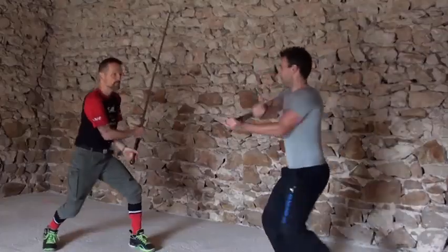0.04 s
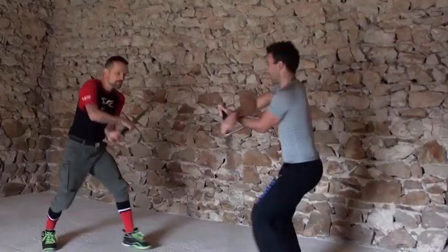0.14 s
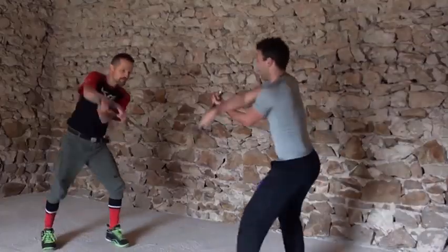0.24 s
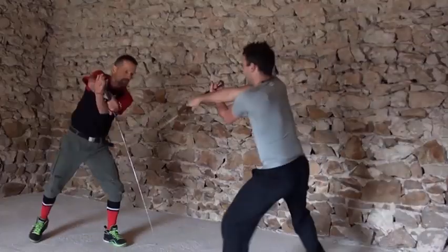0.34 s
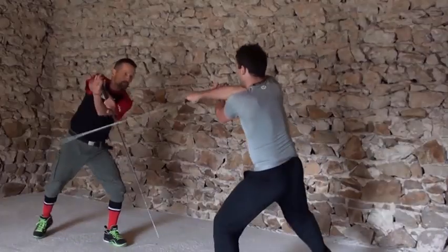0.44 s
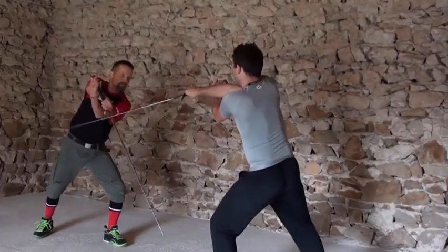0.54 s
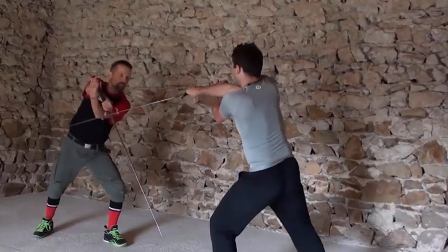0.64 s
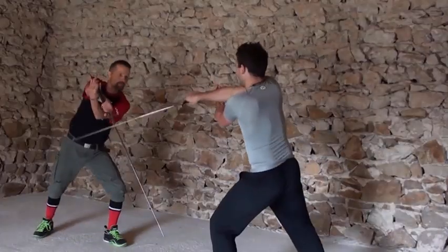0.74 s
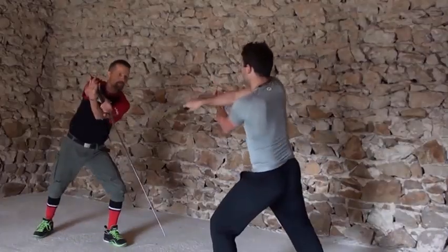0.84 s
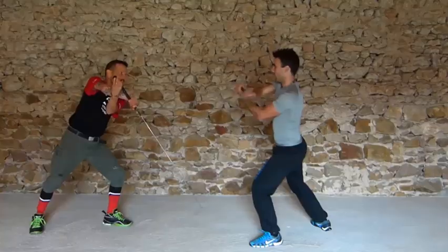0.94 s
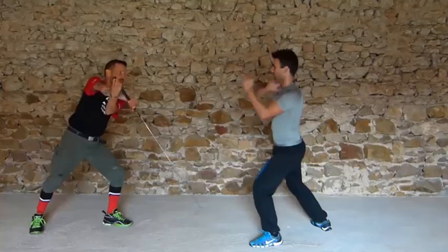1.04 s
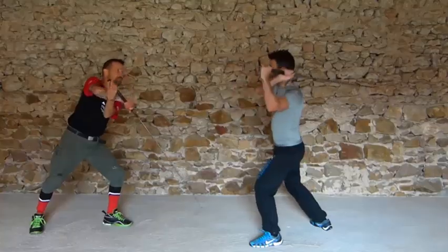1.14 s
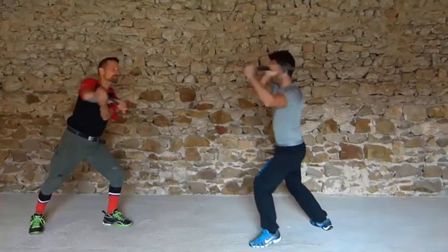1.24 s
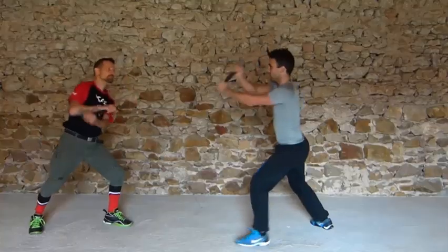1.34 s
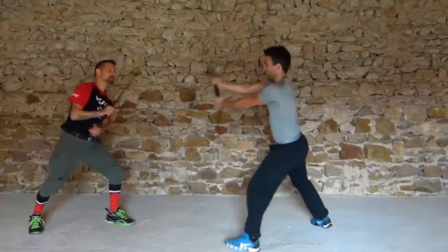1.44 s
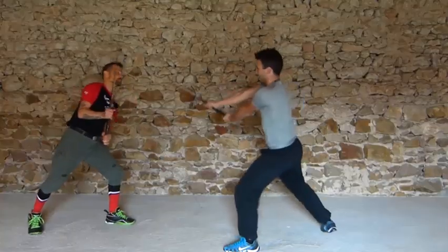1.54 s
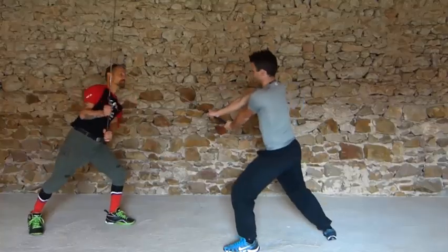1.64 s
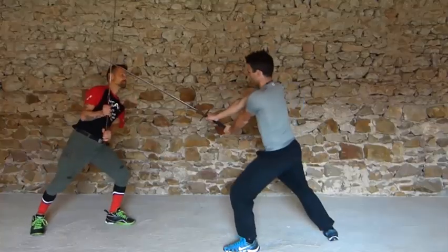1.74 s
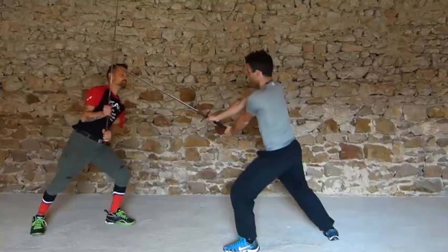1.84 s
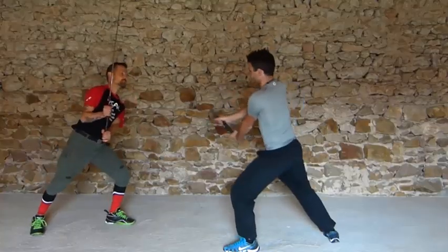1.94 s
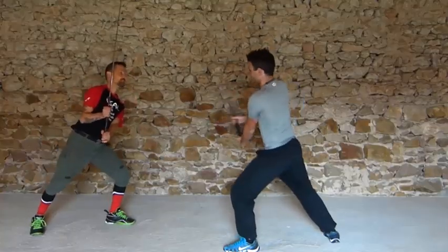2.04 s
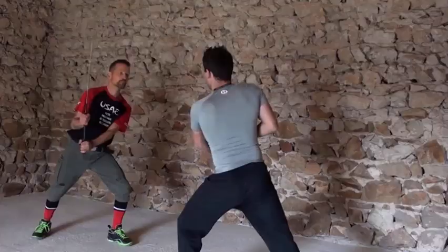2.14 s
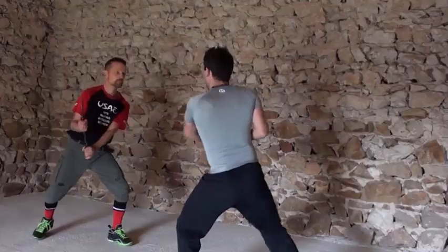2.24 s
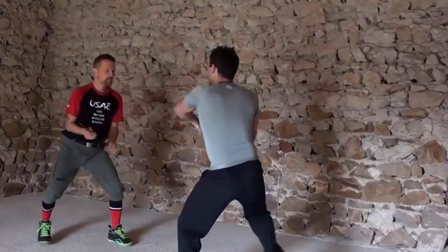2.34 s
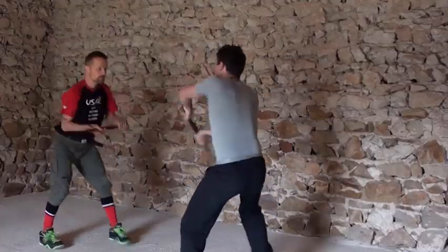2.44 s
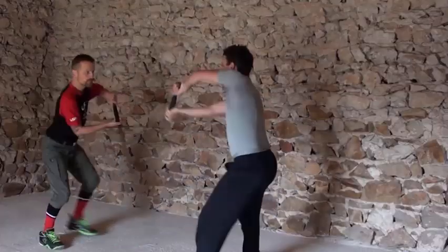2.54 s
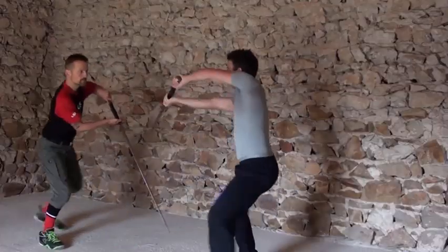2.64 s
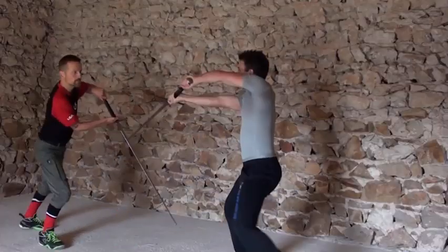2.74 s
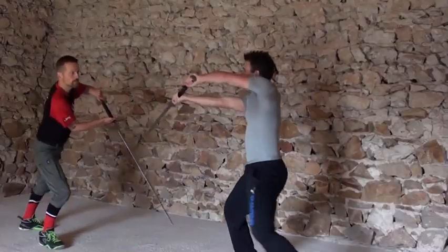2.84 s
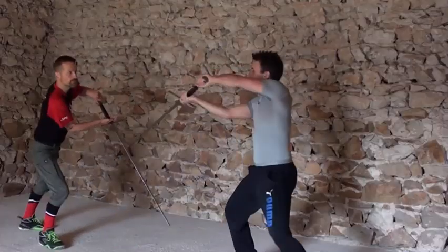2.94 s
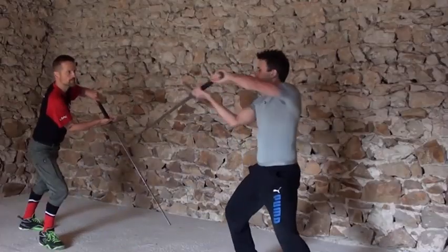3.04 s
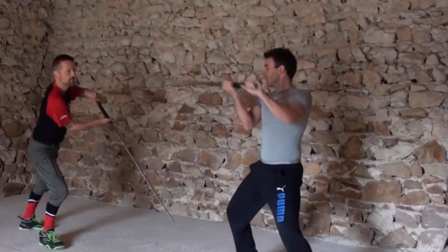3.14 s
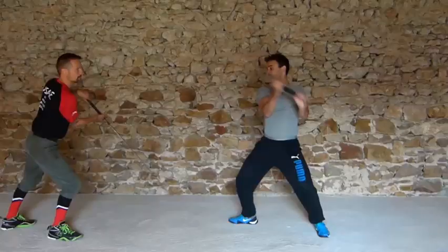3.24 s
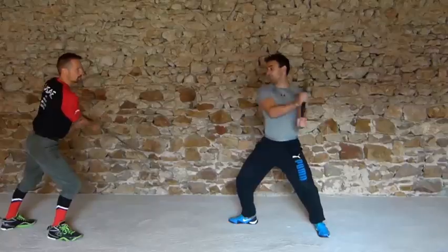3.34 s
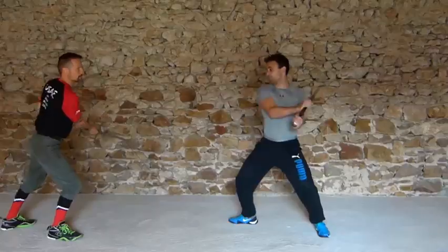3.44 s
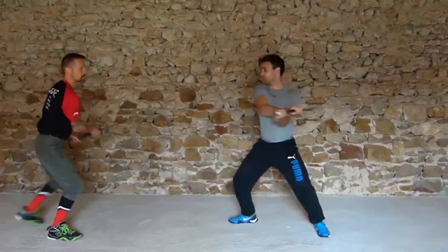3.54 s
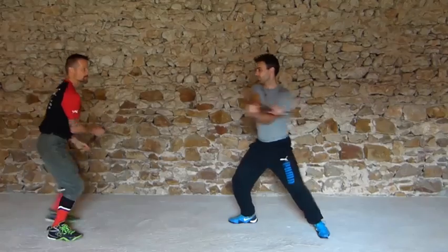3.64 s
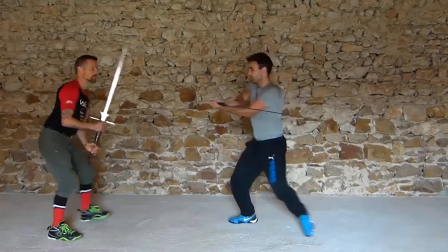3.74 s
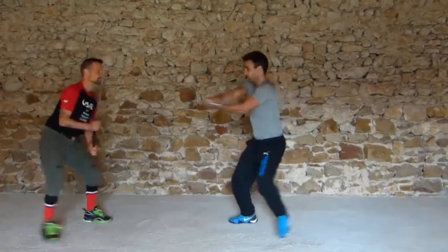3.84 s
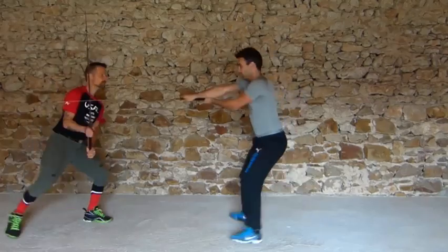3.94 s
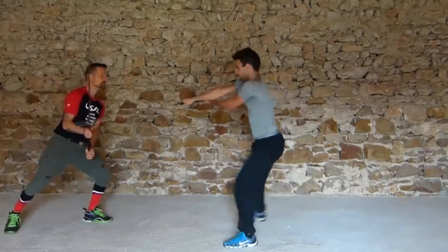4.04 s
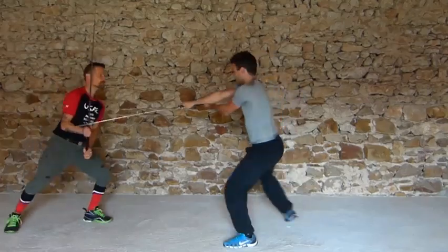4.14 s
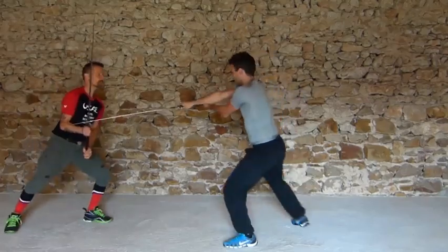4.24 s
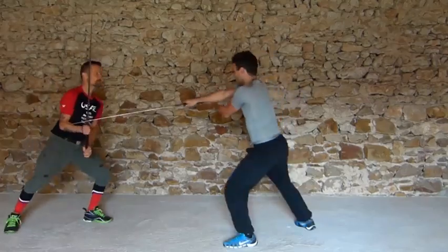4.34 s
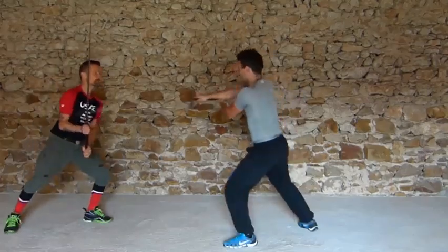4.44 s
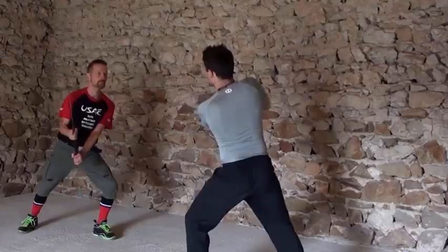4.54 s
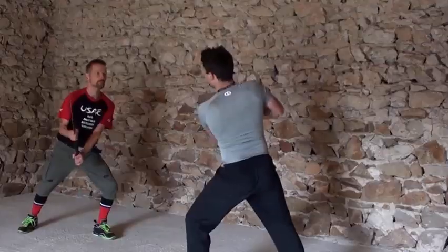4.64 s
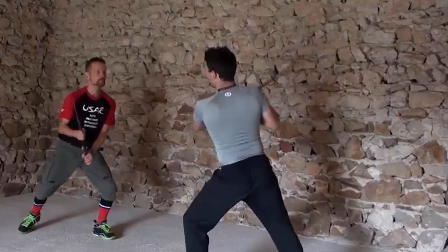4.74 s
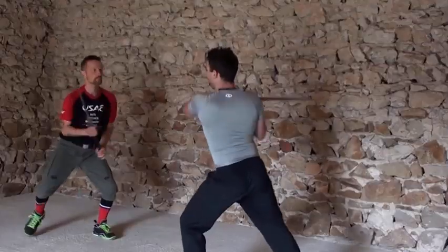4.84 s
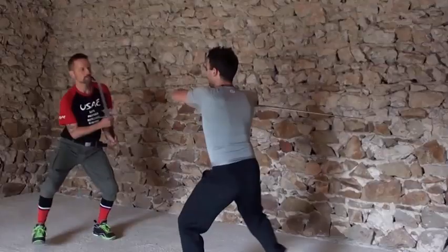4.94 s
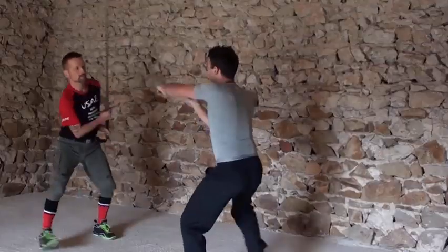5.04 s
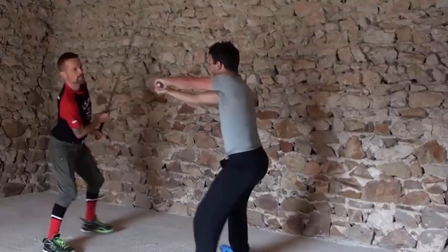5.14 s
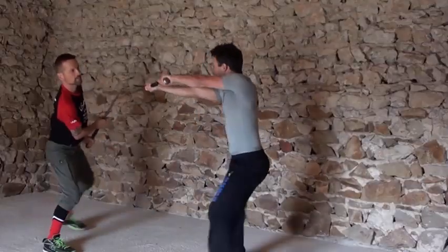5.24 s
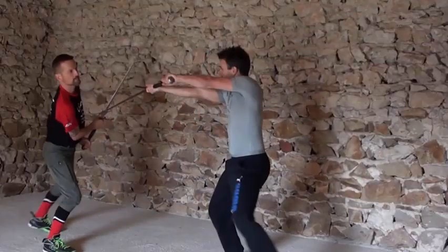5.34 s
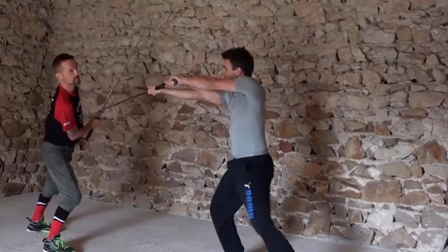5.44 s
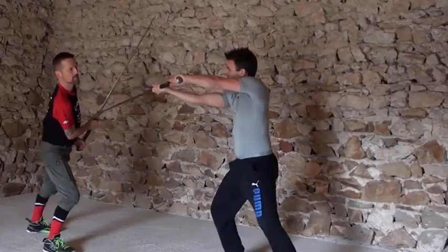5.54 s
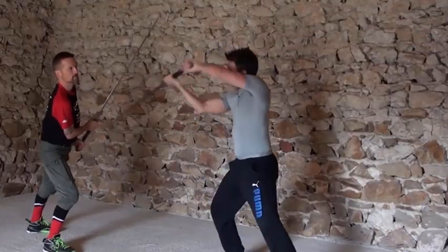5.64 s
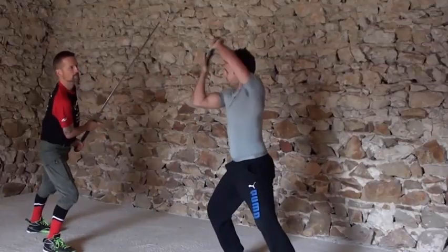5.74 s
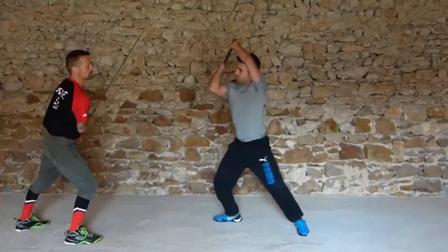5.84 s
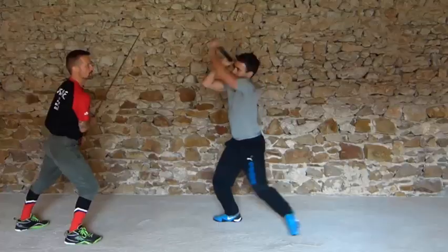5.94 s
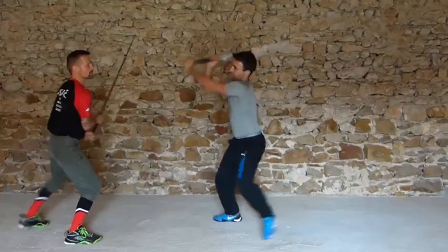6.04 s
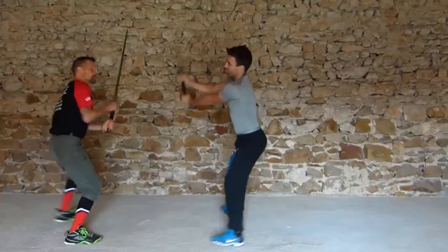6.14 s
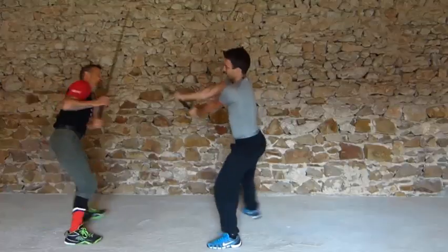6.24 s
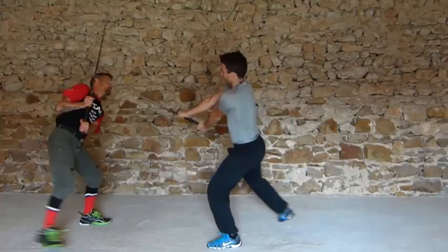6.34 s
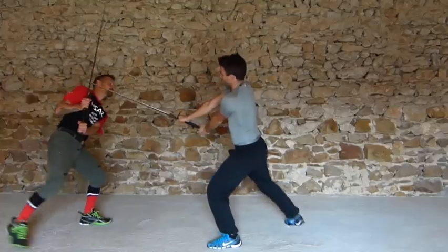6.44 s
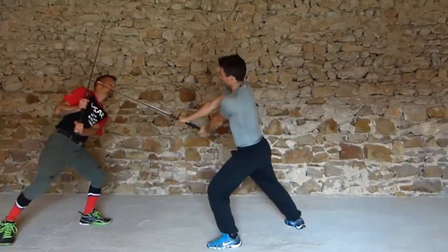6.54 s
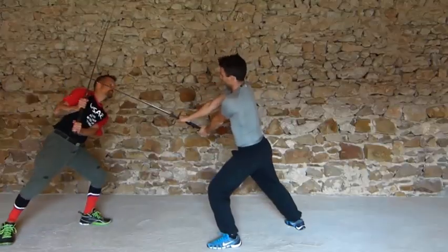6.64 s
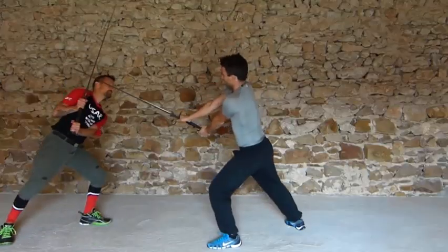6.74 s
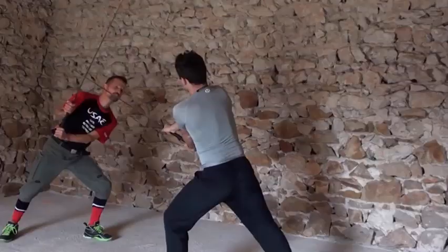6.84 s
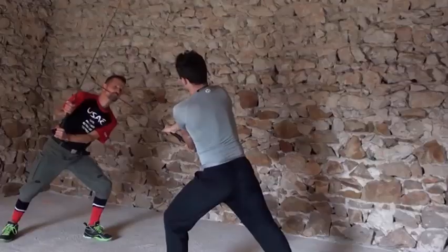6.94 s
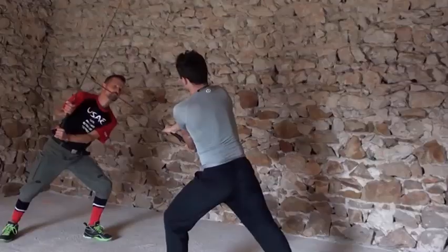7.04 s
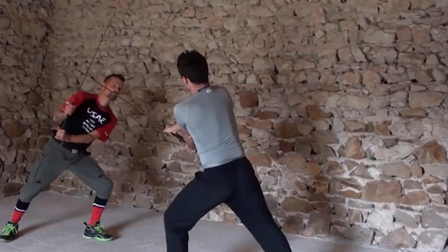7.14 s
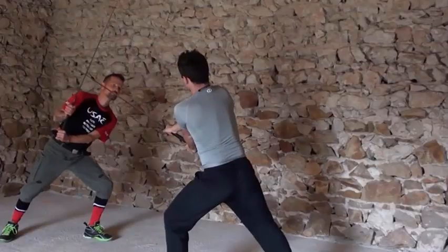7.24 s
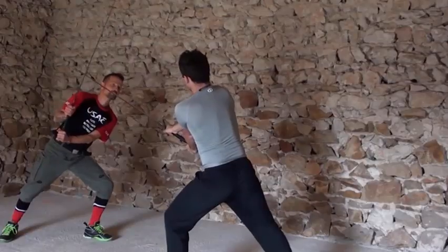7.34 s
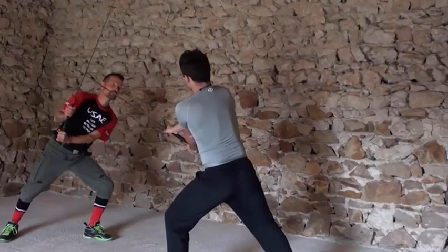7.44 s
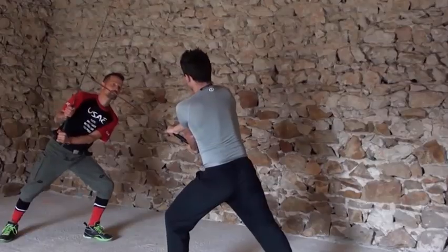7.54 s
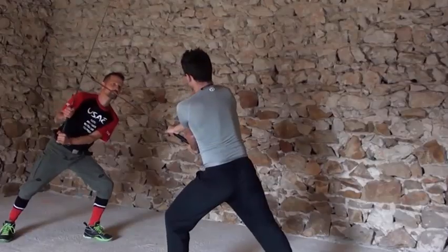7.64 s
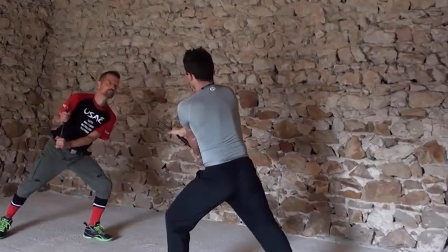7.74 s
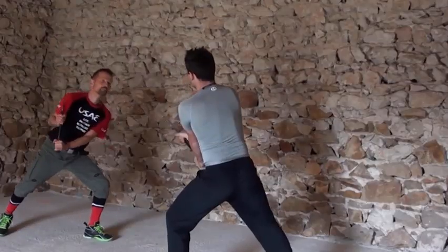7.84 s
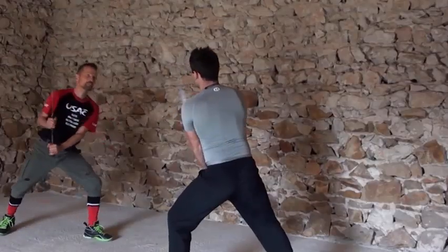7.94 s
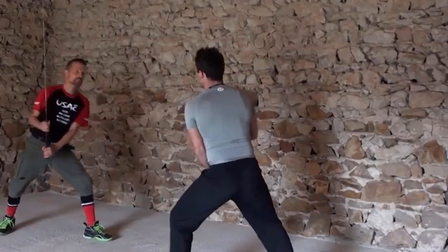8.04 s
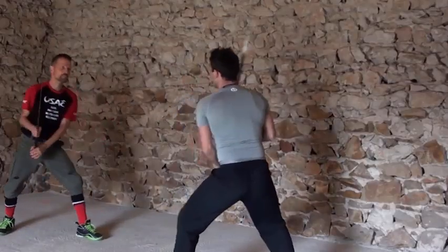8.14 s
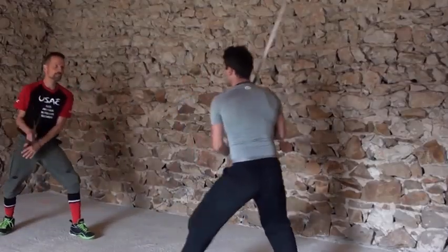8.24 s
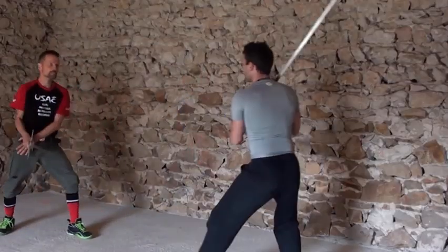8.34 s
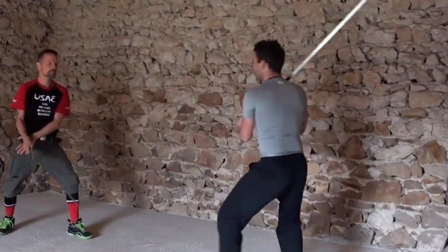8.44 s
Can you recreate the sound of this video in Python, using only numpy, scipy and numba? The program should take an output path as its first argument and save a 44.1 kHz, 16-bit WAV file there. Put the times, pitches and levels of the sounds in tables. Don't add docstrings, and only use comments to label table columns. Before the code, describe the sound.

Two steel longswords clash in hard bright cracks, singly and in quick pairs, ringing high and briefly in a bare stone room with shoe scuffs between.

```python
import sys
import numpy as np
from scipy import signal
from scipy.fft import rfft, irfft
from scipy.io import wavfile
from scipy.ndimage import uniform_filter1d, minimum_filter1d, map_coordinates
from numba import njit

SR = 44100
rng = np.random.default_rng(int(sys.argv[2]) if len(sys.argv) > 2 else 0)


def unload_wav(signal):
    wavfile.write(
        sys.argv[1],
        SR,
        np.round(np.clip(np.atleast_2d(signal).T, -1, 1) * 32767).astype(np.int16),
    )


def volts_from_decibels(level):
    exponent = np.asarray(level, float) / 20
    return 10 ** exponent


N = 374409


def colour(x, table):
    hz, db = np.transpose(table)
    log_hz = np.log(np.linspace(1, SR / 2, 1025))
    cepstrum = irfft(np.interp(log_hz, np.log(hz), db) * np.log(10) / 20)
    cepstrum[1:1024] *= 2
    cepstrum[1025:] = 0
    response = irfft(np.exp(rfft(cepstrum)))
    return signal.oaconvolve(x, response / np.sqrt(np.sum(response ** 2)))[:len(x)]


def band(x, lo_hz, hi_hz):
    sos = signal.butter(2, [lo_hz, min(hi_hz, .45 * SR)], "band", fs=SR, output="sos")
    y = signal.sosfilt(sos, x)
    return y / np.std(y)


def walk(rate):
    hold = int(SR / rate)
    levels = np.repeat(rng.standard_normal(N // hold + 1), hold)
    return 1.3 * uniform_filter1d(uniform_filter1d(levels, hold), hold)[:N]


def bursts(s, db, t60_s, rise_s):
    size = 2048
    t, out = np.arange(size) / SR, np.zeros(N + size)
    shape = volts_from_decibels(-60 * t / t60_s) * (1 - np.exp(-t / rise_s))
    rattle = rng.standard_normal((len(s), size))
    for _ in range(4):
        spectrum = rfft(rattle * shape)
        rattle = irfft(spectrum / np.abs(spectrum)) / np.sqrt(shape + 1e-3)
    rattle = rattle * shape
    for at, gain, one in zip((s * SR).astype(int), volts_from_decibels(db), rattle):
        out[at:at + size] += gain * one / np.linalg.norm(one)
    return out[:N]


def envelopes(shape):
    t = np.arange(0, N / SR + .001, .001)
    return np.interp(np.arange(N) / SR, t, shape(t).sum(axis=0))


def fading(s, db, t60_s, beats=0):
    swell_s = .018
    s, db, t60_s, beats = s[:, None], db[:, None], t60_s[:, None], np.reshape(beats, (-1, 1))
    stilled_s = np.r_[s[1:], [[N / SR]]]

    def swelling_ring(t):
        age_s = (t - s).clip(0)
        decay = volts_from_decibels(db - 60 * age_s / t60_s)
        swell = 1 - np.exp(-age_s / swell_s)
        stilling = np.exp(-(t - stilled_s).clip(0) / swell_s)
        return decay * swell * stilling * np.cos(np.pi * beats * (t - s))
    return envelopes(swelling_ring)


@njit
def ring(at, size, pole, keep):
    out = np.zeros(N)
    for m in range(len(pole)):
        z, k = 0j, 0
        for i in range(N):
            if k < len(at) and i == at[k]:
                z, k = z * keep[k] + size[k, m], k + 1
            z = z * pole[m] + 1e-18
            out[i] += z.imag
    return out


def strike(s, db, keep, modes, scatter_db, sway_m):
    hz, mode_db, t60_s = np.transpose(modes)[:3]
    size = volts_from_decibels(db + mode_db + scatter_db * rng.standard_normal((len(s), len(hz))))
    pole = np.exp(2j * np.pi * hz / SR - np.log(1000) / (t60_s * SR))
    order = np.argsort(s)
    tone = ring((s[order] * SR).astype(np.int64), size[order], pole, keep[order])
    delay = sway_m / 343 * SR * walk(4)
    return map_coordinates(tone, [np.arange(N) + delay], order=3)


def hush():
    # pitch_hz, level_db
    air = [(25, 7.5), (100, -12), (330, -8), (800, -20.5), (2000, -24.5), (6000, -25), (11000, -32.5),
           (16000, -31.5)]
    mid, side = (colour(rng.standard_normal(N), air) for _ in range(2))
    return volts_from_decibels(-59.5) * (mid + volts_from_decibels(-2.5) * side * np.array([[1], [-1]]))


def scuffs():
    # start_s, length_s, level_db, rasp_db, hiss_db
    drags = [(0.0, 0.016, -50.5, -2, -3), (0.133, 0.14, -19.5, -6.5, -10), (0.302, 0.03, -21, -6.5, -32.5),
             (1.4, 0.081, -41.5, -3, -27), (0.98, 0.2, -52.5, -8.5, -18), (1.19, 0.43, -45, -5.5, -11.5),
             (2.097, 0.25, -55.5, 0.5, 1.5), (2.381, 0.15, -45.5, -6, 2.5), (3.18, 0.033, -73, 29.5, 22),
             (3.365, 0.045, -76, 24, 22.5), (3.448, 0.19, -51, 3.5, -1.5), (3.662, 0.22, -44.5, -9, -10.5),
             (4.278, 0.11, -37.5, 6, -1.5), (4.45, 0.29, -81, 16, 11), (4.601, 0.13, -60, 5.5, 14),
             (4.76, 0.085, -56, 1, -8), (4.843, 0.052, -60.5, 1, -2.5), (5.032, 0.23, -39, -13, -10.5),
             (5.828, 0.14, -60, -3.5, -3.5), (6.012, 0.23, -45, 2.5, 2), (6.63, 0.17, -63.5, 19, 16),
             (6.695, 0.26, -61, 6.5, -5), (7.108, 0.052, -67, 13, 9), (7.494, 0.17, -58, 6, 1),
             (7.63, 0.093, -45, -7.5, -10), (7.749, 0.3, -53.5, -3, -1), (8.078, 0.15, -28.5, -4, -9.5),
             (8.19, 0.15, -40.5, -8.5, -8)]
    # pitch_hz, level_db
    sliding_sole = [(35, -79), (60, -22.5), (466, -5), (629, -3.5), (702, -4.5), (2020, -9.5), (2600, -21),
                    (3380, -49), (5720, -120)]
    hiss_colour = [(3500, -28.5), (6000, 8.0), (9000, -1.5), (12000, -12.5), (16000, -28.5)]
    rise_share, sag_db, fade_db_per_s = 0.52, -6, 111
    s, length_s, db, rasp_db, hiss_db = np.transpose(drags)[:, :, None]

    def drag(t):
        done = ((t - s) / length_s).clip(0, 1)
        after_s = (t - s - length_s).clip(0)
        return (done / rise_share).clip(0, 1) * volts_from_decibels(sag_db * done - fade_db_per_s * after_s)

    low = envelopes(lambda t: drag(t) * volts_from_decibels(db))
    middle = envelopes(lambda t: drag(t) * volts_from_decibels(db + rasp_db))
    high = envelopes(lambda t: drag(t) * volts_from_decibels(db + hiss_db))

    def friction():
        grit = rng.standard_normal(N) * volts_from_decibels(2.7 * rng.exponential(size=N).clip(0, 6))
        rub = colour(rng.standard_normal(N), sliding_sole) * volts_from_decibels(2.5 * walk(16))
        rasp = band(grit, 1600, 4100) * volts_from_decibels(0.41 * walk(22))
        hiss = colour(grit, hiss_colour) / np.std(grit) * volts_from_decibels(1.0 * walk(26))
        return low * rub + middle * rasp + high * hiss

    mid, side = friction(), volts_from_decibels(-19) * friction()
    return np.array([mid + side, mid - side])


def squeaks():
    # start_s, length_s, slip_rate_hz, level_db
    slips = [
        (2.101, 0.056, 3100, -54),
        (3.632, 0.016, 2480, -40),
        (4.628, 0.065, 1310, -42.5),
        (4.76, 0.086, 1292, -51.5),
        (5.005, 0.047, 2590, -51.5),
    ]
    t, out = np.arange(N) / SR, 0
    wobble = 1 + .03 * walk(60) + .027 * walk(500)
    chatter = volts_from_decibels(3.5 * walk(120))
    for s, length_s, hz, db in slips:
        phase = 2 * np.pi * np.cumsum(hz * wobble) / SR
        press = np.interp(t, [s, s + .006, s + length_s, s + length_s + .01], [0, 1, .4, 0])
        stack = 0
        for k in range(1 + (hz < 2000), int(11000 / hz) + 1):
            hz_per_db = 350 if k * hz < 7000 else 200
            stack = stack + volts_from_decibels(-abs(k * hz - 5600) / hz_per_db) * np.sin(k * phase)
        out = out + volts_from_decibels(db - 7.5) * press * chatter * stack
    return out


def snaps():
    # start_s, level_db
    steel_ticks = [(1.4067, -13.5), (2.2192, -24), (3.189, -54), (3.224, -46), (3.682, -23.5), (3.7832, -20),
                   (4.323, -30), (4.585, -25), (4.677, -31), (4.689, -33), (4.876, -36), (5.1694, -15.5),
                   (6.0765, -19), (6.086, -18), (6.091, -11.5), (6.8849, -21), (7.1094, -41), (7.4953, -27),
                   (8.0655, -26), (3.8908, -25), (3.3783, -41), (2.1005, -37), (4.891, -40)]
    s, db = np.transpose(steel_ticks)
    clicks = bursts(s, db - 6.0, t60_s=0.01, rise_s=0.00042)
    return colour(clicks, [(2000, -3.0), (5000, 1.5), (8000, 2.5), (12000, -9), (16000, -28.5)])


def stamps():
    # start_s, level_db, slap_db
    landings = [(0.3012, -16.5, 10), (0.145, -42, 22.5), (1.429, -17.5, -3), (2.432, -20, -15),
                (3.744, -29.5, -28), (3.96, -12.5, 0), (5.198, -17.5, 2.5), (6.123, -27, -61.5),
                (7.654, -50, -19), (7.701, -48, -21), (4.89, -47.5, -10), (8.067, -50, 9)]
    # pitch_hz, level_db
    heel = [(24, -60), (40, -20.5), (195, -5), (377, -9), (711, -7.5), (1050, -13), (2110, -14),
            (3800, -26.5), (9000, -38), (11700, -71.5), (19800, -120)]
    slap_colour = [(600, -0.5), (1200, 2), (1900, 10.0), (3500, -6), (5000, -23), (9000, -35.0)]
    s, db, slap_db = np.transpose(landings)
    thud = colour(bursts(s, db + 12.0, t60_s=0.024, rise_s=0.000041), heel)
    slap = colour(bursts(s, db + slap_db + 9.5, t60_s=0.0048, rise_s=.0001), slap_colour)
    return thud, slap


def song():
    # start_s, first_db, second_db, third_db, t60_s
    settings = [(0.0, -51.5, -97, -55.5, 1.3), (0.35, -14.5, -20.5, -23.5, 4.6), (.47, -9.5, -27, -22, 3),
                (.524, -12.5, -25, -23.5, 1.05), (.63, -19.5, -31.5, -25, 0.83),
                (1.506, -15.5, -15.5, -14.5, 1.2), (1.67, -34, -33, -29, 0.68),
                (2.565, -4, -35, -34.5, 1.3), (2.756, -10, -6, -36.5, 0.43), (2.92, -30.5, -31, -44, 0.51),
                (3.13, -46, -56, -61, 0.56), (3.935, -16.5, -21.5, -40, 1.1),
                (4.044, -2.5, -18, -37.5, 0.29), (4.366, -28.5, -30, -33, 0.81),
                (4.7, -42, -62.5, -58.5, 0.59), (5.223, -14.5, -1.5, 0, 0.36),
                (5.5, -38.5, -43.5, -61, 2.7), (5.68, -44.5, -53.5, -61, 0.81), (5.86, -56, -62, -60, 0.96),
                (6.245, -30, -12.5, -36.5, 4.5), (6.36, -35, -21.5, -26.5, 1.13),
                (6.5, -39.5, -36.5, -44, 0.74), (6.62, -48, -47, -65, 1.5), (6.797, -42, -40, -58, 1),
                (6.86, -47.5, -45, -60, 0.96), (7.107, -51, -51, -71, 0.56), (7.497, -82, -74, -68, 1.1)]
    song_hz = [5272, 4882, 5360]
    lasts_share = [1.1, 0.64, 1]
    paired = {2.565: 29, 3.13: 15}
    # start_s, level_db, t60_s
    guard, guard_hz = [(0.347, -43, 1.4), (.524, -26.5, 0.41), (1.505, -24, 1.2), (1.669, -29.5, 0.42),
                       (2.567, -24.5, 0.81), (2.756, -20, 0.27), (3.934, -44.5, 2.5), (4.046, -35, 0.25),
                       (4.366, -60, 0.8), (5.223, -32, 0.4), (6.245, -51, 3), (6.4, -46, 1.2),
                       (6.7, -49, 2), (6.9, -55, 1), (7.109, -60, 0.95), (7.497, -47.5, 1.03)], 4513
    s, *levels_db, t60_s = np.transpose(settings)
    beats = np.array([paired.get(at, 0) for at in s])
    tones = []
    for hz, db, share in zip(song_hz, levels_db, lasts_share):
        tones.append((hz, fading(s, db, t60_s * share, beats * (hz == song_hz[0]))))
    tones.append((guard_hz, fading(*np.transpose(guard))))

    swing = .002 * np.tanh(walk(4))
    bends = []
    for apart in (0, -.0055, .006, .0115):
        speed = 1 + swing + apart + .0007 * walk(25) + .4 * apart * walk(10)
        bends.append(np.cumsum(speed) / SR)
    out = 0
    for hz, size in tones:
        for bent, path_db, lean_db in zip(bends, (.5, -7, -9, -14), (1.0, -3.0, 3.5, -1.0)):
            flutter = volts_from_decibels(path_db + 3.0 + 0.69 * walk(13))
            tone = size * flutter * np.sin(2 * np.pi * (hz * bent + rng.random()))
            out = out + tone * volts_from_decibels([[lean_db], [-lean_db]])
    return out


def woken():
    # start_s, pitch_hz, level_db
    favoured = [(.35, 5780, -24), (.35, 6160, -27), (.35, 4610, -28), (.35, 6670, -29), (.35, 8490, -31),
                (.35, 7670, -30), (.35, 9840, -35), (.524, 6156, -27), (.524, 7270, -30), (.524, 8510, -30),
                (.524, 5771, -31), (1.506, 7140, -21), (1.506, 6200, -24), (1.506, 4540, -28),
                (1.506, 8460, -29), (1.506, 6570, -29), (1.506, 8680, -31), (1.506, 3870, -30),
                (1.506, 2940, -33), (2.565, 6620, -25), (2.565, 6170, -25), (2.565, 4200, -30),
                (2.565, 9370, -29), (2.565, 8000, -28), (2.565, 5780, -28), (2.756, 6150, -31),
                (2.756, 6630, -28), (2.756, 8460, -30), (2.756, 7140, -30), (3.934, 5690, -26),
                (3.934, 6620, -26), (3.934, 7770, -27), (3.934, 8090, -27), (3.934, 8470, -27),
                (3.934, 6200, -27), (4.046, 9400, -30), (4.046, 8680, -30), (4.046, 3760, -33),
                (4.366, 6630, -44), (4.366, 8470, -47), (4.366, 6120, -44), (5.223, 5780, -19),
                (5.223, 6210, -20), (5.223, 6590, -21), (5.223, 8670, -21), (5.223, 7610, -23),
                (5.223, 7190, -23), (5.223, 9380, -25), (5.223, 3620, -29), (5.223, 9810, -30),
                (6.246, 8450, -22), (6.246, 6220, -22), (6.246, 5700, -24), (6.246, 6700, -24),
                (6.246, 7150, -26), (6.246, 7690, -29), (6.246, 9420, -31), (6.246, 3760, -31),
                (6.246, 4290, -31), (6.246, 2940, -35)]
    t60_s, twin_db, twin_spread, low_loss_db = .26, -4, .006, -5
    s, hz, db = np.transpose(favoured)
    db = db + low_loss_db * (hz < 5000)
    twin_hz = hz * (1 + twin_spread * rng.standard_normal(len(hz)))
    mode_t60_s = np.tile(t60_s * 6000 / np.maximum(hz, 6000), reps=2)
    modes = np.transpose([np.r_[hz, twin_hz], np.r_[db, db + twin_db], mode_t60_s])
    blows = np.unique(s)
    own = np.where(blows[:, None] == np.r_[s, s], 0, -200)
    return strike(blows, own, np.full(len(blows), .4), modes, scatter_db=0.5, sway_m=.12)


def lone_tones():
    # start_s, pitch_hz, level_db, t60_s
    lone = np.array([(2.566, 2085, -25, .16), (2.567, 2160, -25, .16), (2.758, 2060, -26, .12),
                     (2.759, 2140, -26, .12), (2.76, 2240, -30, .12), (5.224, 3752, -64, 2),
                     (5.68, 3765, -73, 1.5), (6.7335, 6160, -48, .045), (6.7345, 6620, -47, .045),
                     (6.7355, 5770, -54, .4), (6.888, 6620, -48, .03), (7.112, 7140, -62, .15),
                     (7.113, 8050, -67, .2), (7.114, 7600, -65, .2), (1.029, 6600, -62, .2),
                     (1.03, 9000, -71, .12), (3.642, 10100, -61, .03), (5.02, 8000, -66, .04),
                     (5.955, 7800, -72, .04), (.146, 2000, -44, .06), (.147, 1600, -46, .06),
                     (.175, 620, -43, .1), (.2, 850, -46, .08), (4.63, 12600, -63, .04),
                     (4.632, 12400, -65, .06), (4.631, 7600, -55, .15), (4.68, 9100, -60, .03),
                     (4.77, 7000, -58, .12), (.865, 420, -57, .05), (.867, 330, -59, .05),
                     (6.3, 915, -54, 1.8), (7.11, 3790, -70, .6), (6.75, 2980, -63, .3),
                     (6.887, 6200, -43, .03), (7.111, 5780, -62, .3), (7.498, 6620, -58, .1),
                     (7.499, 7550, -65, .2), (7.5, 7100, -60, .1), (4.05, 9800, -33, .22),
                     (4.368, 7800, -45, .2), (4.369, 9800, -50, .2)])
    s, modes, keep = lone[:, 0], lone[:, 1:], np.ones(len(lone))
    own = np.where(np.eye(len(lone)), 0, -200)
    brief = lone[:, 3] < .05
    low = strike(s, own - 200 * brief, keep, modes, scatter_db=0, sway_m=0.25)
    pings = strike(s, own - 200 * ~brief, keep, modes, scatter_db=0, sway_m=0.25)
    return low, pings


def swords():
    # start_s, level_db, edge_db, dense_ring_db, upper_tones_db
    cut = np.array([
        (0.3497, 2, -3, -9.5, -12.5),
        (0.524, -6.5, -2, -15.5, -9),
        (1.505, 1, -2.5, -27, -7),
        (1.6698, -21.5, 0.5, -9.5, -0.5),
        (2.5641, 0, -1.5, -10.5, -14),
        (2.7555, -5, -0.5, -11, 8.5),
        (3.9331, -1.5, -1, -6.5, 0),
        (4.045, -8, -3, -5, -2),
        (5.223, -3, 1, -4, -8),
        (6.2448, 2, -0.5, 5.5, 8),
    ])
    # start_s, level_db, ring_db, edge_db
    touch = np.array([(0.146, -22, -33, -8), (1.0274, -49, -7, -17), (1.242, -37.5, -27, -22),
                      (2.099, -36, -35, -33), (3.187, -39.5, -18, -5), (3.377, -34.5, -20, -19),
                      (3.5505, -32.5, -29, -28), (3.894, -28.5, -27, -13), (4.365, -14, -15, -5.5),
                      (4.6274, -24, -22, -30), (4.764, -28.5, -25, -25), (4.875, -37.5, -27, -23),
                      (6.0216, -41, -20, -21), (6.7335, -23, -25, -32), (6.795, -32, -7, -25),
                      (6.885, -35, -22, -26), (7.107, -34.5, -13, -21), (7.4979, -30.5, -26, -26),
                      (7.7903, -41, -21, -10), (8.0674, -48, -11, 2)])
    # pitch_hz, level_db, t60_s
    blade = [(5669, -11, 0.51), (5760, -15, 0.58), (6078, -12, 0.5), (6137, -11, 0.59), (6234, 0, 0.36),
             (6492, -16, 0.65), (6621, -10, 0.49), (6659, -7, 0.45), (7165, -18, 0.59), (7687, -8, 0.37),
             (7822, -18, 0.36), (8096, -18, 0.52), (8269, -16, 0.43), (8457, -3, 0.46), (8872, -14, 0.35),
             (9378, -8, 0.28), (9625, -18, 0.32), (10520, -34, 0.3), (11040, -30, 0.25), (11510, -34, 0.25),
             (11890, -32, 0.25), (12550, -26, 0.2)]
    # pitch_hz, level_db, t60_s
    singing = [(5686, -5, .4), (5775, -2, .5), (6135, 0, .4), (6205, -2, .3), (6640, -3, .35),
               (7144, -1, .3), (8460, -2, .25)]
    # pitch_hz, level_db
    crack = [(59, -66.5), (100, -34.5), (202, -20), (576, -19.5), (761, -18), (1170, -9.5), (4290, 1),
             (5200, 4.5), (6870, 4), (14800, -18.5), (16500, -67.5)]
    overload_db = 8.5
    body_colour = [(60, -55.0), (200, -39), (500, -25.5)] + crack[4:9] + [(9000, -13.0), (12000, -52)]
    edge_colour = [(4000, -29.0), (6500, -4.0), (8000, -1.5)] + crack[9:]

    hard, light = np.ones(len(cut)), np.ones(len(touch))
    s = np.r_[cut[:, 0], touch[:, 0]]
    db = np.r_[cut[:, 1] + overload_db, touch[:, 1]]
    keep = np.r_[.3 * hard, .9 * light]
    body_db = db + np.r_[10.5 * hard, 5.5 * light]
    edge_db = body_db + np.r_[cut[:, 2], touch[:, 3]] + 2.5
    ring_db = db + np.r_[cut[:, 3], touch[:, 2] + 10] - 34.5
    tone_db = db + np.r_[cut[:, 4], touch[:, 2] + 9] - 38.0

    graze = bursts(cut[:, 0] - .005, body_db[:len(cut)] - 10, t60_s=0.055, rise_s=0.0079)
    graze = colour(graze, crack[5:])
    body = colour(bursts(s, body_db, t60_s=0.016, rise_s=0.00068), body_colour)
    edge = colour(bursts(s, edge_db, t60_s=0.016, rise_s=0.0013), edge_colour)
    pressed = np.array(blade) * [1, .45, .35]
    dense = strike(s, ring_db[:, None], keep, pressed, scatter_db=4.5, sway_m=0.088)
    upper = strike(s, tone_db[:, None], keep, singing, scatter_db=3.0, sway_m=0.045)
    low, pings = lone_tones()
    return graze + body + edge + low, dense + upper + woken() + pings


def room(x):
    # pitch_hz, t60_s
    decay = [(150, 0.38), (500, 0.71), (1500, 0.5), (4000, 0.5), (8000, 0.34), (14000, 0.22)]
    # delay_s, level_db
    echoes = [(.0032, -2), (.0095, 3), (.0197, -1), (.0305, -8), (.041, -18.5)]
    tail_db, side_db = -21, -14
    t = np.arange(SR) / SR
    hz, t60_s = np.transpose(decay)
    tail = np.zeros((2, SR))
    for centre_hz in 45 * 2 ** np.arange(0, 8.6, .5):
        band_t60_s = np.interp(np.log(centre_hz), np.log(hz), t60_s)
        fade = volts_from_decibels(-60 * t / band_t60_s) * np.sqrt(centre_hz / SR)
        lo_hz, hi_hz = centre_hz / 2 ** .25, centre_hz * 2 ** .25
        tail += fade * [band(noise, lo_hz, hi_hz) for noise in rng.standard_normal((2, SR))]
    mid, side = tail * volts_from_decibels(tail_db) * (1 - np.exp(-t / 0.0068))
    side = side * volts_from_decibels(side_db)
    mid[0] += 1
    side[:2] += [-.2, .2]
    for k, (s, db) in enumerate(echoes):
        mid[int(s * SR)] += volts_from_decibels(db)
        side[int(s * SR)] += (-1) ** k * volts_from_decibels(db - 21.5)
    return signal.fftconvolve(x[None], [mid + side, mid - side], axes=1)[:, :N]


@njit
def limit(x, ceiling, release):
    gain, e = np.empty(len(x)), 0.
    for i in range(len(x)):
        e = max(x[i], e * release)
        gain[i] = min(1., ceiling / (e + 1e-9))
    return gain


def scene():
    clicks = snaps()
    thud, slap = stamps()
    crack, rings = swords()
    near = scuffs() * volts_from_decibels(np.array([[-.8], [.8]])) + clicks + slap + volts_from_decibels(9) * rings
    far = room(crack + rings + thud + volts_from_decibels(-1.5) * slap + squeaks() + volts_from_decibels(-5.0) * clicks)
    return far + song() + near + hush()


def band_limit(x):
    return signal.sosfilt(signal.butter(12, 16640, fs=SR, output="sos"), x)


def record(dry):
    ceiling_db, release_s = -8.5, 0.07
    dry = signal.sosfilt(signal.butter(2, 170, "high", fs=SR, output="sos"), dry)
    loud = uniform_filter1d(np.abs(dry).max(axis=0), size=24)
    loud = -minimum_filter1d(-loud, size=129)
    gain = limit(loud, volts_from_decibels(ceiling_db), np.exp(-1 / (release_s * SR)))
    gain = uniform_filter1d(gain, size=97)
    held = 1.056 * np.tanh(dry * gain / 1.119)
    mix = signal.sosfilt(signal.ellip(8, .2, 40, 16000, fs=SR, output="sos"), held)
    return band_limit(mix)


dry = scene()
out = record(dry)
unload_wav(out)
```